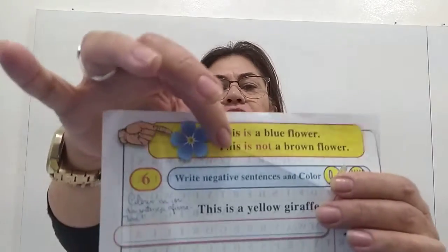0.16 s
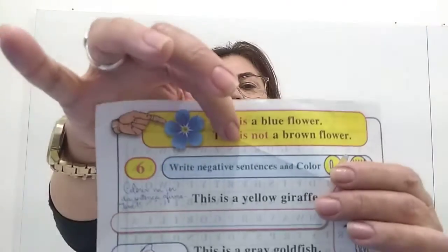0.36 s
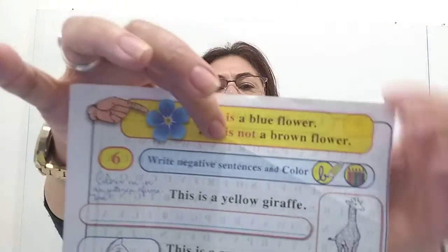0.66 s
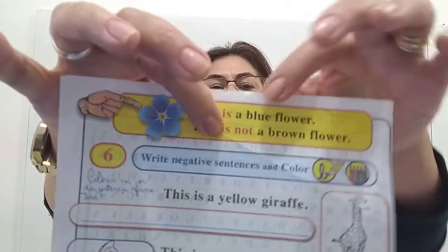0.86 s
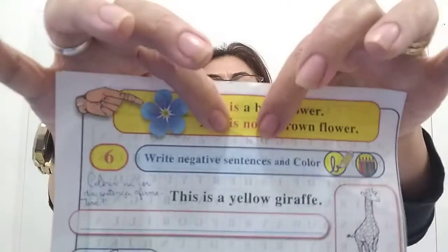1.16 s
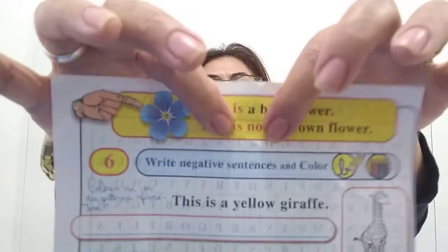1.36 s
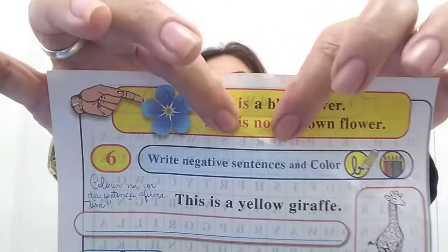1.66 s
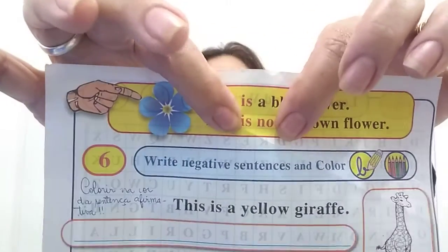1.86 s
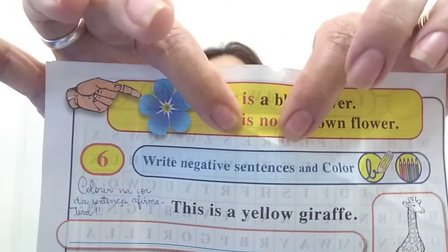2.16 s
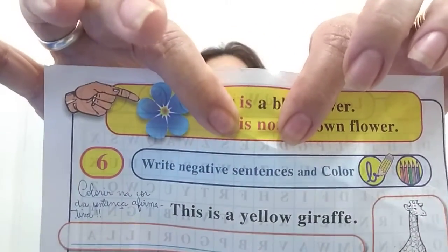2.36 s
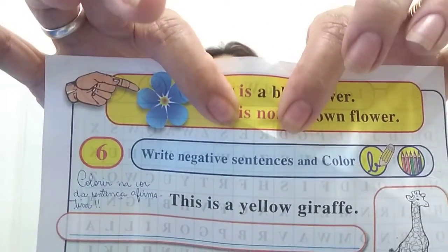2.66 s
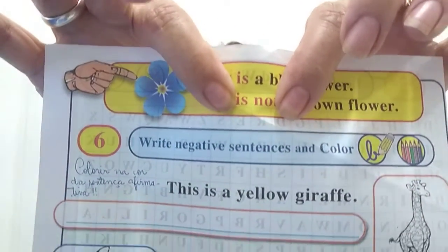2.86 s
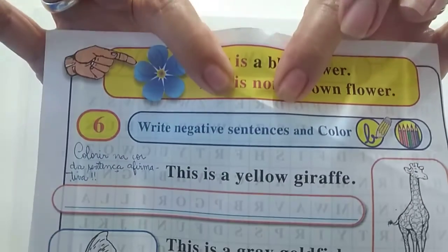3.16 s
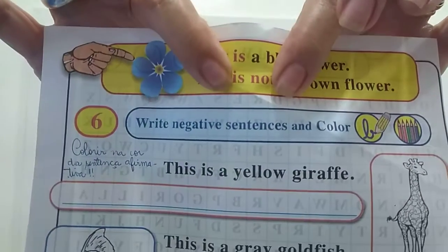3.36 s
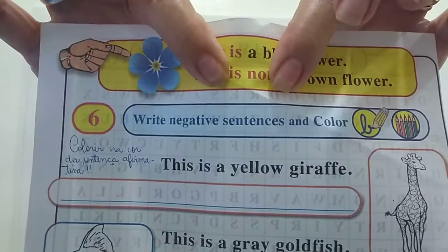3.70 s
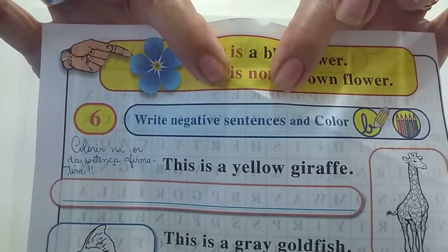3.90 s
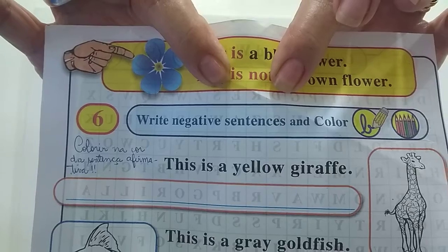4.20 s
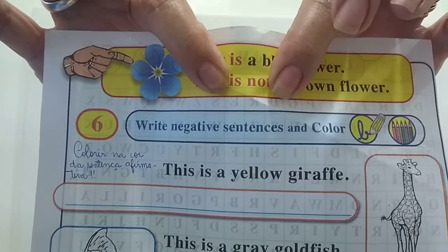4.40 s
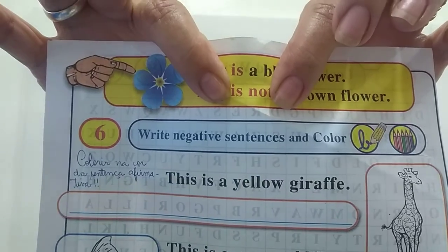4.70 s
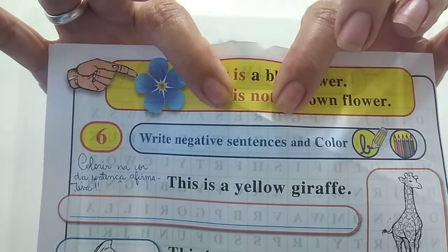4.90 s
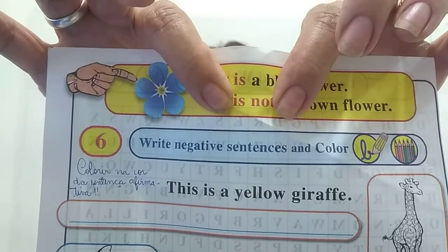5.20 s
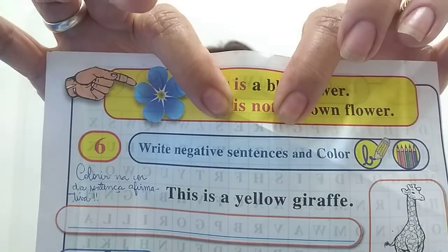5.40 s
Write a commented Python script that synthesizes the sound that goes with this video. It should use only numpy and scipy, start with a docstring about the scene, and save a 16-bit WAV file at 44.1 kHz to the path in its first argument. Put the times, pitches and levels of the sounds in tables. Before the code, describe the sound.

A paper sheet is handled right beside a phone microphone in a bare, reflective room, over steady low mains hum, soft ventilation and thin hiss. Around 0.1-0.3 s it flaps with dull thumpy pushes and a sharp snap, trailing low rustle. Dry finger scuffs and a small flap follow at 0.4-0.7 s, with faint crinkles near 0.9-1.2 s. At 1.3 s there is a brisk rub, then a clear snap at 1.44 s and another brighter one at 1.9 s. Between 2.1 and 2.25 s several cracks crowd together, the loudest at about 2.17 s, overloading the phone so the level briefly dips; bright echoes ring on. A tiny click comes at 2.5 s and the rustle settles. From about 3 s hum and air dominate, with two short even runs of very faint mechanical ticks at 3.66-3.8 and 3.86-4.0 s. The background softens slightly after 4.5 s until the end, about 5.6 s.

```python
"""Paper sheet snapping in an echoing room

A paper worksheet close to a phone flaps, slides under the fingers and buckles with sharp snaps.
Snaps are kicked resonances; flaps, slides and rustle are shaped noise, echoed by a bare room.
Behind them are mains hum made of sine waves, ventilation made of noise, and two runs of faint ticks.
The phone makes stereo from two microphone ports, and its gain control ducks on an overload."""
import sys
import numpy as np
from scipy import signal
from scipy.fft import rfft, irfft, next_fast_len
from scipy.io import wavfile
from scipy.ndimage import map_coordinates

SR = 44100
rng = np.random.default_rng(int(sys.argv[2]) if len(sys.argv) > 2 else 0)


def int16_out(signal):
    """Quantize to a 16-bit WAV file."""
    q = np.round(np.clip(np.atleast_2d(signal).T, -1, 1) * 32767)
    wavfile.write(sys.argv[1], SR, q.astype(np.int16))


N = 244490  # length of the sound in samples


def amp(db):
    """Turn decibels into an amplitude factor."""
    return 10 ** (np.asarray(db) / 20)


def unit(x):
    """Scale a sound to an rms of 1."""
    return x / np.sqrt(np.mean(x ** 2) + 1e-20)


def along(points, hz):
    """Read a curve of (Hz, value) points on a log frequency axis."""
    f, v = np.transpose(points)
    return np.interp(np.log(hz + 1), np.log(f + 1), v)


def curve(rows):
    """Give one value per sample from (seconds, value) rows."""
    return np.interp(np.arange(N) / SR, *np.transpose(rows))


def wobble(rate):
    """A smooth random curve with `rate` random points a second."""
    points = rng.standard_normal(int(N * rate / SR) + 4)
    return map_coordinates(points, [np.arange(N) * rate / SR])


def filtered(x, response):
    """Pass x through a filter given as a complex response of frequency."""
    n = x.shape[-1]
    padded = next_fast_len(n + SR // 10, True)
    spectrum = rfft(x, padded) * response(np.fft.rfftfreq(padded, 1 / SR))
    return irfft(spectrum, padded)[..., :n]


def causal(gain):
    """The response with this gain that starts at once and rings afterwards (minimum phase)."""
    cepstrum = irfft(np.log(np.maximum(gain, 1e-6)))
    half = len(cepstrum) // 2
    cepstrum[1:half] *= 2
    cepstrum[half + 1:] = 0
    return np.exp(rfft(cepstrum))


def resonance(f, hz, width):
    """Response of one damped vibration, centred on hz and `width` Hz wide."""
    return 1j * f * width / (hz * hz - f * f + 1j * f * width)


def noise(colour):
    """Coloured noise of rms 1, unrelated at the two ports."""
    white = rng.standard_normal((2, N))
    return unit(filtered(white, lambda f: amp(along(colour, f))))


def add(track, s, sound, db):
    """Place a short sound; its level is its energy spread over 4 ms."""
    size = np.sqrt(np.sum(sound ** 2) / (.004 * SR))
    part = track[:, round(s * SR):][:, :sound.shape[1]]
    part += amp(db) / size * sound[:, :part.shape[1]]


# The sheet buckles. Each row: start in seconds, level in dB, panel pitch in Hz, panel width as a
# fraction of its pitch, crease pitch in Hz, crease width as a fraction of its pitch, crease over panel
# in dB, fold pitch in Hz, fold over panel in dB, flutter level in dB, flutter time to fall 60 dB in
# seconds, level sent into the room relative to the snap in dB.
BUCKLES = [(0.16, -20, 805, 1.4, 3140, 0.38, 1, 6160, -7, -8, 0.019, 0.5),
           (0.6794, -43.5, 700, .85, 3500, 1.3, 2, 7900, 2, -18, .017, -5),
           (0.934, -49, 2100, .7, 4200, 0.49, 6, 6000, 2, -16, .017, -1),
           (1.4391, -24.5, 770, 0.5, 2460, 0.4, -4, 5590, -7.5, -22, 0.017, 1.5),
           (1.9151, -21, 1420, 1.2, 3400, 0.14, 7, 5200, -7, -24, 0.02, 2.5),
           (2.0854, -31.5, 2200, 1.4, 3650, 0.75, 0, 11250, 12.5, -14, 0.014, 6),
           (2.1539, -36, 1260, 0.76, 3210, .6, -3, 5600, -12, -16.5, 0.016, -2),
           (2.1680, -13.5, 1550, 0.26, 3400, 0.28, 0.5, 4800, 1.5, -21.5, 0.019, 3),
           (2.1820, -27.5, 704, 0.55, 3000, .95, -1, 5500, -9, -14, 0.019, 4.5),
           (2.2385, -34, 700, 0.43, 2600, 0.93, -4.5, 5500, -13, -17, 0.021, 5),
           (2.511, -42.5, 1700, .5, 3720, 0.62, 9, 5330, 3, -18, 0.012, 0)]
# Tone of the snap at the ports. Each row: frequency in Hz, gain in dB.
SNAP_TONE = [(60, -7), (200, 1), (500, 0), (1500, 0), (2400, 3), (3500, -3.5), (5500, -1.5), (6500, -7.5),
             (8000, -13), (11000, -18), (14500, -24.5)]
# Tone of the crack sent into the room. Each row: frequency in Hz, gain in dB.
CRACK_TONE = [(100, -12), (500, -4.5), (1300, 2), (2200, -3), (3200, 2), (4500, 0.5), (6000, -3),
              (7500, -8), (11000, -7), (14500, -16)]


def snaps(far_db=-9, spread=0.000335, fibre_db=-27, fibre_t60=0.02, fold_width=0.16):
    """A buckle kicks a panel, a crease and a fold; bending waves flutter and paper fibres crackle."""
    direct, radiated = np.zeros((2, N)), np.zeros((2, N))
    t = np.arange(SR // 10) / SR
    for (s, db, panel_hz, panel_width, crease_hz, crease_width, crease_db, fold_hz, fold_db,
         flutter_db, flutter_t60, echo_db) in BUCKLES:
        flutter = amp(flutter_db - 60 * t / flutter_t60) * rng.standard_normal((2, len(t)))
        kick = flutter * (1 - np.exp(-t / 0.00014))
        kick[0, 0] += 1  # the buckle itself
        kick[1] *= amp(far_db)

        def paper(f):
            panel = resonance(f, panel_hz, panel_width * panel_hz)
            crease = amp(crease_db) * resonance(f, crease_hz, crease_width * crease_hz)
            fold = amp(fold_db) * resonance(f, fold_hz, fold_width * fold_hz)
            # low bending waves travel slower and arrive later
            bending = np.exp(-4j * np.pi * spread * np.sqrt(f * panel_hz))
            return (panel + crease + fold) * bending * causal(amp(along(SNAP_TONE, f)))

        add(direct, s, filtered(kick, paper), db)
        # the room receives the broad crack of the whole sheet
        click = np.array([t == 0, t == 0]) * 1.0
        crack = filtered(click, lambda f: causal(amp(along(CRACK_TONE, f))))
        add(radiated, s, crack, db + echo_db)
        # the fine crackle grows more slowly than the force of the snap
        fibres = amp(-60 * t / fibre_t60) * rng.standard_normal((2, len(t)))
        crackle = filtered(fibres, lambda f: resonance(f, 10710, 6140))
        add(direct, s, crackle, fibre_db + 0.7 * db)
    return direct, radiated


# The whole sheet flexes. Each row: start in seconds, level in dB, brightness in Hz, air push over
# rattle in dB, time for the rattle to fall 60 dB in seconds.
FLEXES = [(0.0939, -28, 1870, 7, 0.053), (0.116, -45, 4000, 17, .1), (.1610, -28, 175, 15, 0.093),
          (0.1682, -21.5, 1600, 23.5, 0.059), (.200, -40.5, 1090, 3, 0.11),
          (0.2514, -27.5, 1850, 19, 0.057), (.2585, -36, 1500, 9, 0.12), (0.543, -30.5, 2550, 8, .055),
          (.565, -43.5, 2200, 0, 0.19), (1.035, -41, 260, 0, .25), (1.194, -45.5, 500, -3, .2),
          (1.3170, -40, 670, 1, .13), (1.4400, -38, 804, 1, 0.11), (1.5600, -42, 750, -5, 0.15),
          (1.8899, -38.5, 760, 8, 0.064), (2.279, -43, 600, 0, 0.11), (2.382, -47, 646, 3, .15)]
# Tone of the flexing sheet. Each row: frequency in Hz, gain in dB.
SHEET_TONE = [(40, -34), (115, -3), (165, 7), (300, 0.5), (600, 5), (1100, 5), (1800, 1), (3000, 3.5),
              (6000, -13.5), (14000, -4)]
CRINKLES_PER_S = 450  # tiny creases that give way during a flap


def flaps(far_db=-9, grain_db=1.0, crinkle_db=9):
    """A soft push on the sheet and its dull, dying rattle, broken by separate crinkles."""
    track, t = np.zeros((2, N)), np.arange(SR // 6) / SR
    for s, db, bright_hz, push_db, t60 in FLEXES:
        rattle = amp(grain_db * wobble(643)[:len(t)]) * rng.standard_normal((2, len(t)))
        crinkles = (rng.random(len(t)) < CRINKLES_PER_S / SR) * rng.choice([-2, 2], len(t))
        rattle += amp(crinkle_db) * crinkles
        rattle *= amp(-60 * t / t60) * amp([[0], [far_db]])
        rattle[0, 0] += amp(push_db)

        def dull_sheet(f):
            return causal(amp(along(SHEET_TONE, f)) / np.sqrt(1 + (f / bright_hz) ** 4))

        add(track, s, filtered(rattle, dull_sheet), db)
    return track


# Fingers slide over the paper. Each row: start in seconds, rise in seconds, hold in seconds, time to
# fade by 60 dB in seconds, level in dB, treble tilt in dB per octave (well above 3000 Hz).
STROKES = [(.05, .015, .01, 0.28, -50, 15), (0.184, 0.025, 0.031, 0.42, -54.5, 2),
           (0.407, 0.022, 0.0054, 0.28, -41, -1.5), (0.426, .01, 0.014, 0.43, -50, 8),
           (.87, .025, .01, 0.41, -57, 6), (1.033, 0.01, 0.0084, 0.29, -57, -3.5),
           (1.131, 0.014, 0.02, 0.18, -50.5, 1), (1.281, 0.0079, 0.011, 0.067, -37, 3),
           (1.326, .005, 0.0028, .04, -44, 8), (1.386, 0.011, .01, 0.42, -55, 1)]
# Tone of skin on paper. Each row: frequency in Hz, gain in dB.
SCUFF_TONE = [(100, -7.5), (500, 1), (1200, -6), (2200, -0.5), (3500, -0.5), (5500, -1.5), (8000, -10.5),
              (11000, -11), (14500, -11)]
# the sheet rings briefly wherever the skin catches; the rate is for each fingertip
CATCH_HZ, CATCH_WIDTH_HZ, CATCHES_PER_S = 2980, 350, 200


def slides(grain_db=3.0, far_db=-8, catch_db=-7, wander=.06, fingertips=3):
    """Skin slips over fibres in a dense scuff with ringing catches, each fingertip at its own pitch."""
    track, age = np.zeros((2, N)), np.arange(SR // 2) / SR
    ports = amp([[0], [far_db]])
    for s, rise, hold, fade, db, tilt_db in STROKES:
        grain = amp(grain_db * wobble(1500)[:len(age)])
        slips = rng.standard_normal((2, len(age))) * grain * ports
        scuff = unit(filtered(
            slips, lambda f: amp(along(SCUFF_TONE, f) + tilt_db * np.log2(1 + f / 3000))))
        moments = rng.random((fingertips, 1, len(age))) < CATCHES_PER_S / SR
        catches = moments * rng.standard_normal((fingertips, 2, len(age))) * ports
        ring_hz = CATCH_HZ * np.exp(wander * rng.standard_normal((fingertips, 1, 1)))
        rings = filtered(catches, lambda f: resonance(f, ring_hz, CATCH_WIDTH_HZ))
        crackle = unit(rings.sum(0))
        # each stroke swells, holds and fades
        swell = np.minimum(age / rise, 1)
        stroke = swell * amp(db - 60 * np.maximum(age - rise - hold, 0) / fade)
        # strokes with more treble have weaker catches
        sound = (scuff + amp(catch_db - tilt_db) * crackle) * stroke / np.sqrt(2)
        track[:, round(s * SR):][:, :len(age)] += sound
    return track


# The hands lift, regrip and bend the sheet. Each row: start in seconds, hold in seconds, level in dB.
HAND_MOVES = [(0.16, 0.15, -46), (1.04, 0.47, -53.5), (2.187, 0.18, -54)]
STIR_RISE_DB_PER_S = 75  # the rustle builds up quickly before a move
STIR_FADE_DB_PER_S = 19.5  # and settles slowly after it


def stir(lumpy_db=3.0):
    """Each move of the hands sets the sheet trembling with a low, uneven rustle that slowly settles."""
    t = np.arange(N) / SR
    levels_db = []
    for s, hold, db in HAND_MOVES:
        rise_db = STIR_RISE_DB_PER_S * np.maximum(s - t, 0)
        fade_db = STIR_FADE_DB_PER_S * np.maximum(t - s - hold, 0)
        levels_db.append(db - rise_db - fade_db)
    level_db = np.max(levels_db, axis=0)
    rustle = noise([(40, -7.0), (150, 3.5), (400, 3.5), (1200, -1.5), (2200, -13.5),
                    (5000, -13.5), (14000, -22.0)])  # (Hz, dB)
    return amp(level_db + lumpy_db * wobble(24.75)) * rustle * amp([[-3], [-10]])


# How long the room rings. Each row: frequency in Hz, time to fall 60 dB in seconds.
ROOM_T60 = [(150, 0.61), (800, 0.45), (3500, 1.97), (6000, 1.15), (12000, 0.43)]
# Tone of the echo. Each row: frequency in Hz, gain in dB.
ECHO_TONE = [(150, -8), (1000, 0.5), (1800, 1.5), (3500, -0.5), (6000, 1.5), (8000, -1.5), (12000, -5.5)]


def room(x, wet_db=-19, near_db=-21, near_t60=0.24):
    """Near surfaces answer almost at once; the bare walls build up more slowly and ring on."""
    hz, t, z = signal.stft(rng.standard_normal((2, SR * 3 // 2)), SR, nperseg=256)
    decay_db = along(ECHO_TONE, hz)[:, None] - 60 * t / along(ROOM_T60, hz)[:, None]
    tail = signal.istft(z * amp(decay_db), SR, nperseg=256)[1]
    t = np.arange(tail.shape[1]) / SR
    tail *= 1 - np.exp(-t / 0.033)
    near = rng.standard_normal(tail.shape) * amp(-60 * t / near_t60) * (1 - np.exp(-t / 0.0023))
    answer = amp(wet_db) * tail / np.linalg.norm(tail) + amp(near_db) * near / np.linalg.norm(near)
    return signal.fftconvolve(x[:1], answer * amp([[1], [-2]]), axes=1)[:, :N]


# Ringing of the small ticking part. Each row: pitch in Hz, width in Hz, level in dB.
TICK_RINGS = [(1570, 165, 4.5), (3400, 300, -4.5), (3750, 130, 4.5)]
# Runs of faint ticks. Each entry: start of a run in seconds.
TICK_STARTS = [3.6595, 3.8595]
TICK_PERIOD_S, TICK_DB = .0332, -54.5  # spacing and typical level within a run


def ticking(length=0.013, step_hz=430, speedup_hz_per_s=22000, rough=0.035, far_db=-7,
            uneven_db=0.85, count=5):
    """Two short, even runs of tiny rasps, perhaps a focus motor stepping in quickening bursts."""
    track, t = np.zeros((2, N)), np.arange(SR // 30) / SR
    steps = np.diff(np.floor(step_hz * t + speedup_hz_per_s * t * t / 2), prepend=-1)
    burst = amp([[0], [far_db]]) / (1 + (t / length) ** 16)

    def ringing(f):
        return sum(amp(db) * resonance(f, hz, width) for hz, width, db in TICK_RINGS)

    for start in TICK_STARTS:
        for s in start + TICK_PERIOD_S * np.arange(count):
            rasp = (steps + rough * rng.standard_normal((2, len(t)))) * burst
            add(track, s, filtered(rasp, ringing), TICK_DB + uneven_db * rng.standard_normal())
    return track


# Tone of the moving air. Each row: frequency in Hz, gain in dB.
AIR_TONE = [(25, -9), (50, -1), (90, 7.5), (170, 2), (300, -4), (600, -3.5), (1000, -7), (1500, -11),
            (2100, -15.5), (3500, -14.5), (5000, -15.5), (8000, -21.5), (14500, -35.5)]


def ventilation(air_db=-57):
    """Soft rush of air as gently wavering noise, a little stronger at one port."""
    return noise(AIR_TONE) * amp(air_db + 0.72 * wobble(11)) * amp([[0], [-3]])


MAINS_HZ = 60
# Mains hum. Each row: harmonic number, left level in dB, right level in dB, angle by which the right
# leads in radians, change with the sheet held close in dB.
HUM_HARMONICS = [(2, -47, -54.5, 2.16, 0.8), (4, -56, -57, 1.23, -1.85), (5, -70, -73, 1.2, 0.5),
                 (6, -74, -63.5, 0.544, 4), (8, -68.5, -65, 1.8, 1.2), (9, -78, -72.5, 1, -0.5),
                 (10, -75, -74.5, 0.76, -2), (12, -72.5, -75, 0.096, -1)]
# How close to the phone the sheet is held. Each row: time in seconds, closeness from 0 to 1.
CLOSENESS = [(1.9, 0), (2.8, 1)]


def hum(waver_db=0.63):
    """Exact mains harmonics, each wavering in level; the sheet held close changes their balance."""
    t, out = np.arange(N) / SR, np.zeros((2, N))
    for order, left_db, right_db, lead, close_db in HUM_HARMONICS:
        phase = 2 * np.pi * round(order) * MAINS_HZ * t
        change_db = close_db * curve(CLOSENESS) + waver_db * wobble(7)
        level_db = np.array([[left_db], [right_db]]) + change_db
        waves = np.cos([phase - lead / 2, phase + lead / 2])
        out += np.sqrt(2) * amp(level_db) * waves
    return out


# Right channel against left. Each row: frequency in Hz, right over left in dB.
RIGHT_OVER_LEFT = [(100, -3), (400, 0), (5000, 0), (8000, 2.5), (13000, 7)]
# Widest phase turn given to the other port. Each row: frequency in Hz, angle in radians.
WIDEST_ANGLE = [(60, 2.37), (120, 2.29), (250, 1.38), (450, 0.93), (1000, 0.59)]
PORT_LAG = 18.8 / 44100  # travel time between the ports in seconds


def stereo(ports):
    """Each channel is one port minus the delayed other port; in the bass they stay nearly in step."""
    def turn(f):
        angle = np.minimum(np.pi - 2 * np.pi * f * PORT_LAG, along(WIDEST_ANGLE, f))
        return np.exp(1j * angle)

    pair = ports + filtered(ports[::-1], turn)
    return filtered(pair, lambda f: amp(along(RIGHT_OVER_LEFT, f) * np.array([[-.5], [.5]])))


# Level of the background, also used for the port hiss. Each row: time in seconds, level in dB.
BACKGROUND_LEVEL = [(.12, -3), (.3, 0.46), (4.45, 0), (4.5, -1.5), (5.1, -4)]


def scene():
    """The paper, its echo and the ticks, in front of the steady sounds of the room."""
    direct, radiated = snaps()
    handling = flaps() + slides() + stir()
    ports = direct + handling + room(radiated + handling) + ticking()
    background = stereo(ventilation()) + hum()
    return stereo(ports) + amp(curve(BACKGROUND_LEVEL)) * background


def gain_control(x, threshold_db=-17, depth_db=12, release=0.36):
    """An overload pulls the gain down within milliseconds; it creeps back slowly."""
    size = SR // 250  # power is averaged over 4 ms
    power = signal.lfilter(np.ones(size) / size, 1, np.mean(x ** 2, axis=0))
    power_db = 10 * np.log10(np.abs(power) + 1e-12)
    overload = np.clip((power_db - threshold_db) / 2, 0, 1)
    fade = np.exp(-np.arange(N) / SR / release)
    held = np.maximum.accumulate(overload / fade) * fade
    attack = np.exp(-1 / (0.0019 * SR))
    return x * amp(-depth_db * signal.lfilter([1 - attack], [1, -attack], held))


# Tone of the phone's hiss. Each row: frequency in Hz, gain in dB.
HISS_TONE = [(100, -12), (2500, -39.5), (4700, -10), (7000, 2.5), (14000, 3)]
TOP_HZ = 14300  # the phone passes nothing much above this
CEILING = .95  # the phone rounds off peaks near full scale


def record(dry, port_hiss_db=-64.5, circuit_hiss_db=-67):
    """The phone adds microphone hiss, gain control, circuit hiss, peak rounding and a band limit."""
    balance = amp([[-3], [0]])
    port_hiss = amp(port_hiss_db + curve(BACKGROUND_LEVEL)) * balance * noise(HISS_TONE)
    circuit_hiss = amp(circuit_hiss_db) * balance * noise(HISS_TONE)
    out = gain_control(dry + port_hiss) + circuit_hiss
    out = out / (1 + np.abs(out / CEILING) ** 12) ** (1 / 12)
    return filtered(out, lambda f: 1 / (1 + (f / TOP_HZ) ** 200))


dry = scene()
out = record(dry)
int16_out(out)
```